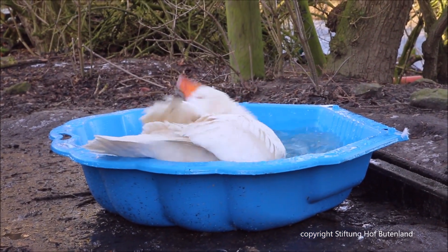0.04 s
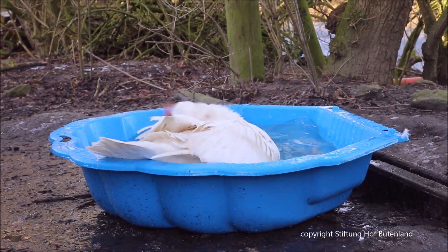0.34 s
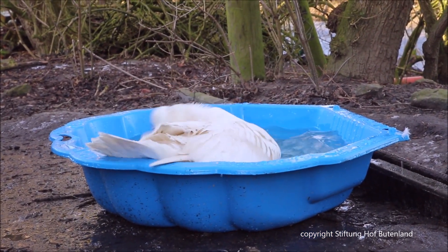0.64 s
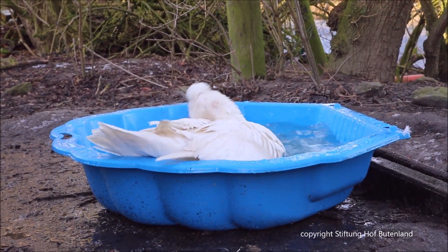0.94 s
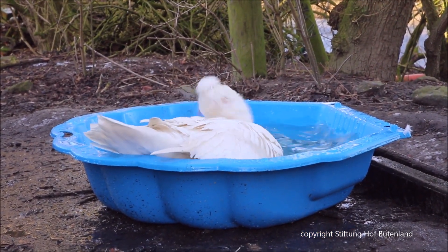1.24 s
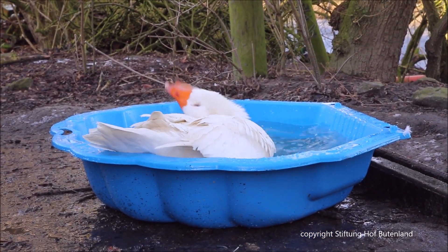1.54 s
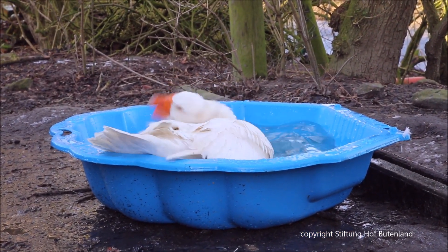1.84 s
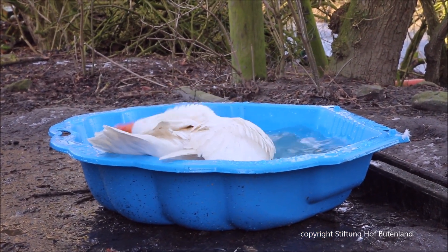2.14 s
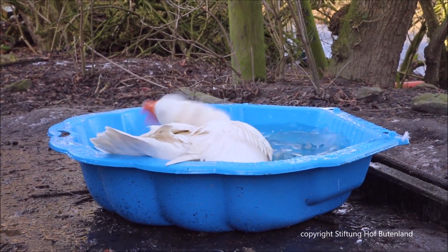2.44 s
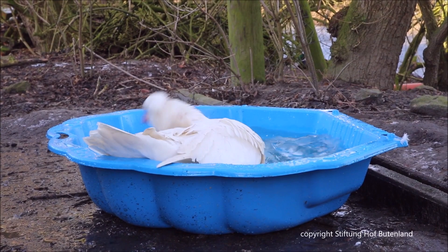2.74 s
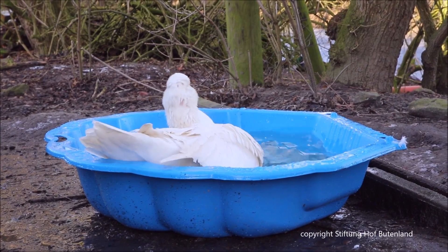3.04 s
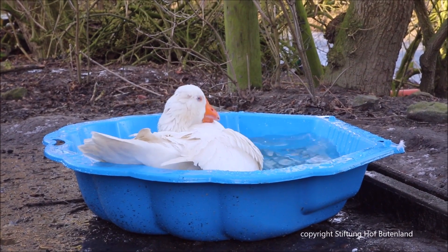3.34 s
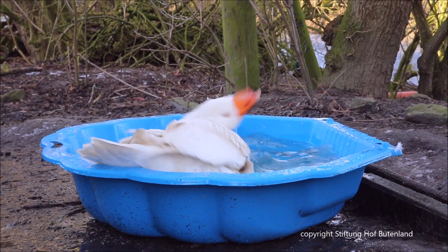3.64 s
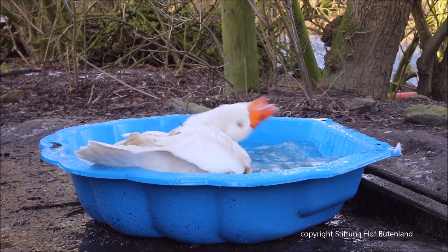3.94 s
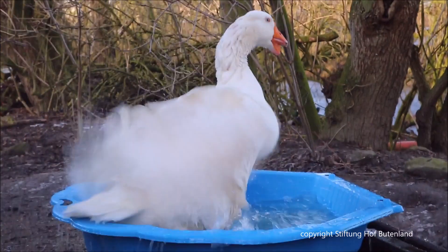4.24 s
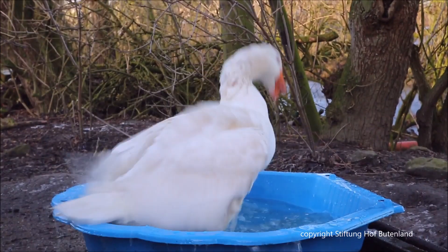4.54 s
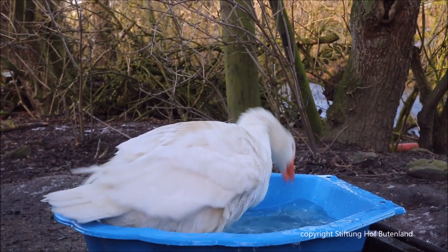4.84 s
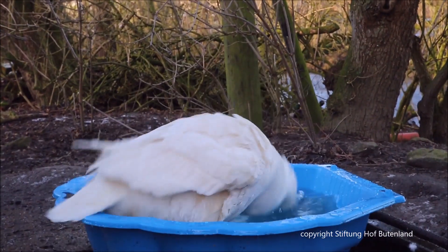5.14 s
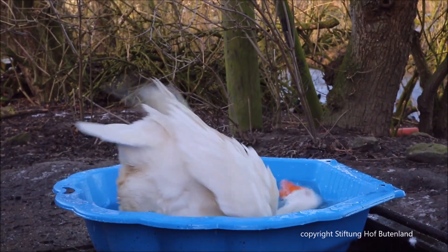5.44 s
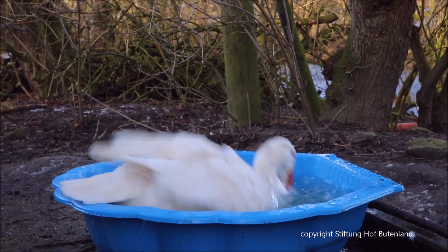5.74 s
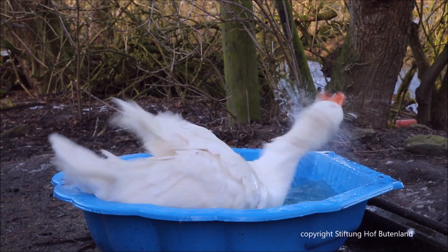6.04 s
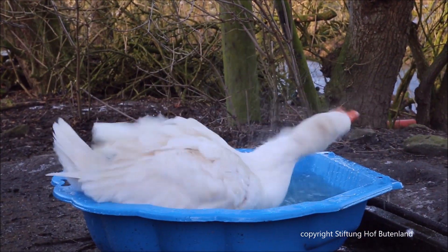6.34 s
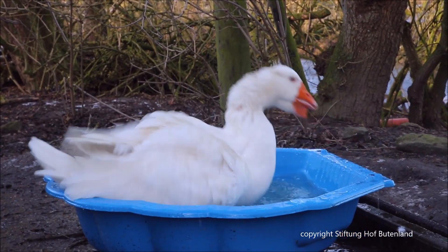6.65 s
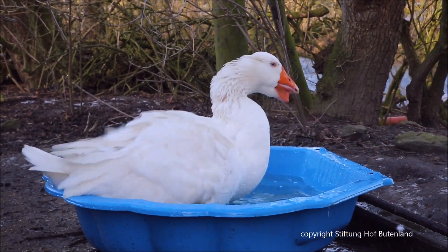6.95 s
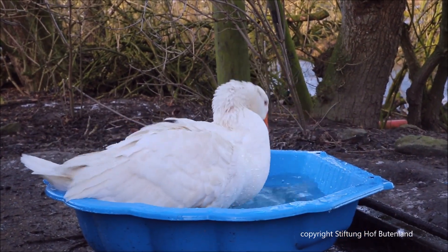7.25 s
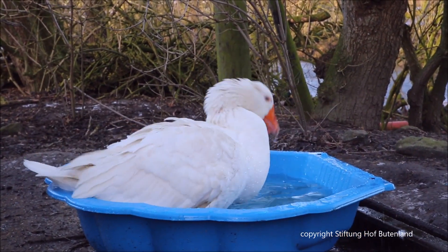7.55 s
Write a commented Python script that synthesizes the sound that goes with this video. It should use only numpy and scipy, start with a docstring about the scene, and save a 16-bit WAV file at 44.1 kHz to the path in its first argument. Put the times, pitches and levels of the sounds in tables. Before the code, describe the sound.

Outdoors among trees, jackdaws call in quick, hoarse yelps over the gentle water sounds of a preening goose nearby. After a split second of silence, the goose bathes more vigorously: wet wings snap, water splashes and gurgles, and the plastic pool knocks dully. Brief high songbird whistles come with the wing shaking. Finally the splashing calms and a distant songbird sings faintly over soft outdoor air.

```python
"""First a goose preens in a plastic paddling pool: water laps, wet feathers snap, and jackdaws call
in the trees, echoed by the wood. Just before 4 s the sound breaks off briefly. Then the goose shakes
its wings and bumps the pool, and small songbirds whistle. It ducks and splashes, churning up ringing
bubbles and spray. Last, the water settles while a distant songbird sings thin notes.
Outdoor air and a thin electronic whine run under both parts."""
import sys
import numpy as np
from scipy import signal
from scipy.fft import rfft, irfft, next_fast_len
from scipy.io import wavfile
from scipy.ndimage import map_coordinates

SR = 44100
rng = np.random.default_rng(int(sys.argv[2]) if len(sys.argv) > 2 else 0)


def master_out(mix):
    """Clip the mix to full scale and print it as 16-bit PCM to the path in sys.argv[1]."""
    frames = np.transpose(np.atleast_2d(mix))
    ceiling = np.clip(frames, -1, 1)
    pcm = np.round(ceiling * 32767).astype(np.int16)
    wavfile.write(sys.argv[1], SR, pcm)


N = 339129
T = np.arange(N) / SR
BREAK_S, BATH_S = 3.897, 4.097  # the sound stops, then comes back for the bath
TOP_HZ = 15850  # nothing higher than this is heard

# The tone of deep sloshing, of splashing and of fine spray, each: (frequency [Hz], level [dB])
SLOSH_TONE = [(70, -9.5), (140, -0.5), (260, 3.5), (450, 0), (800, -26.5)]
SPLASH_TONE = [(250, -20.5), (550, -2.5), (1000, -7.5), (1900, 2.5), (3000, -1), (5000, -4), (9000, -27)]
SPRAY_TONE = [(1500, -24), (3500, -2.5), (6000, 3), (8500, 3.5), (11000, -2.5), (13500, -9.5), (15500, -45)]
# How hard the water is churned, from the wing shake until it settles: (time [s], level [dB])
CHURNING = [(4.1, -39.5), (4.38, -39.5), (4.55, -56), (4.8, -54), (5.1, -53), (5.4, -49), (5.55, -43.5),
            (5.9, -42), (6.2, -42), (6.5, -53.5), (6.9, -58), (7.68, -55.5)]
# Strokes of bill, wings and body through water and wet feathers:
# (time [s], length [s], splash level [dB], slosh above splash [dB], spray above splash [dB])
GOOSE_STROKES = [(0, 0.032, -49, -10, 6), (0.293, 0.025, -40.5, -7.5, 0.5), (0.687, 0.055, -37.5, -9, -0.5),
                 (0.823, 0.084, -44, -3, -5.5), (2.3, 0.018, -52, -0.5, -6), (2.52, 0.043, -45, -4, -12),
                 (4.099, 0.014, -32, -2.5, 1), (4.165, .06, -42, -2.5, -1), (4.317, .035, -35, 2, 2),
                 (4.441, .02, -41.5, -1, 2), (4.533, 0.06, -49, -1, 8), (4.625, .08, -53, -2.5, 8.5),
                 (4.924, .02, -49, -2, -15), (5.01, .04, -50, -0.5, -14), (5.449, 0.065, -43, -8.5, -7),
                 (5.525, .04, -38, -17, -4), (5.632, 0.032, -46.5, 0.5, -9), (5.855, .035, -34, -6, -5),
                 (5.92, .02, -41.5, -3, 4.5), (6, 0.03, -39, -22, -1), (6.25, 0.088, -50.5, -2.5, 3.5),
                 (6.409, 0.034, -46.5, -2.5, 0.5), (6.588, .006, -47, 9, -3), (6.747, .02, -58, 3.5, 5),
                 (7.193, 0.013, -58.5, 8, 4), (7.358, 0.025, -56, 6, -8)]


def water():
    """The goose stirs up big slow bubbles, small chirping ones and spray, each on a wash of noise."""
    big = bubbles(1500, low_hz=150.3, high_hz=620, cycles=1.5, spread_db=2, rise=.023)
    slosh = unit(noise(SLOSH_TONE) + .9 * unit(coloured(big, SLOSH_TONE)))
    fizz = bubbles(5000, low_hz=509, high_hz=4190, cycles=4.4, spread_db=1, rise=.087)
    gurgle = bubbles(1500, low_hz=800, high_hz=3300, cycles=14, spread_db=2.4, rise=.13)
    splash = unit(noise(SPLASH_TONE) + unit(coloured(fizz, SPLASH_TONE)) + 1.2 * gurgle)
    mist = .88 * noise(SPRAY_TONE)
    tiny = bubbles(5000, low_hz=2800, high_hz=13570, cycles=6.8, spread_db=4, rise=.12)
    spray = unit(mist + unit(coloured(tiny, SPRAY_TONE)))
    lapping = amp(-50.5 - 3 * T + 4 * wobble(9)) * (T < BATH_S)  # slowly calms down
    churning = amp(np.interp(T, *np.transpose(CHURNING))) * (T >= BATH_S)
    # each motion: (loudness curve, slosh above splash [dB], spray above splash [dB])
    motions = [(lapping, -3, -9), (churning, -7, -3)]
    for start, length, db, slosh_db, spray_db in GOOSE_STROKES:
        stroke = amp(db) * rise_and_fade(start, length, attack_s=.02, fall_db_per_s=231.5)
        motions.append((stroke, slosh_db, spray_db))
    # motions that overlap add up in power, the square of their strength
    power = sum((amp([[slosh_db], [0], [spray_db]]) * curve) ** 2
                for curve, slosh_db, spray_db in motions)
    slosh_gain, splash_gain, spray_gain = np.sqrt(power)
    flicker = amp(1.5 * wobble(60))
    return slosh_gain * slosh + flicker * (splash_gain * splash + spray_gain * spray)


def bubbles(count, low_hz, high_hz, cycles, spread_db, rise):
    """A cloud of bubbles at random times; each rings briefly and rises in pitch as it dies away."""
    t = np.arange(900) / SR
    when, pitch, softness = rng.random((count, 3)).T[:, :, None]
    hz = low_hz * (high_hz / low_hz) ** pitch
    age = t * hz / cycles
    phase = np.cumsum(hz * (1 + rise * np.minimum(age, 4)), axis=1) / SR
    strength = amp(-spread_db * np.log(.02 + softness))  # a few loud ones, many quiet ones
    rings = strength * np.exp(-age) * (1 - t / t[-1]) * np.sin(2 * np.pi * phase)
    positions = (when * N).astype(int) + np.arange(len(t))
    return unit(np.bincount(positions.ravel(), rings.ravel(), N)[:N])


# Wet feathers snapping and drops hitting the plastic:
# (time [s], relative level [dB], extra level for the slap [dB])
WET_SNAPS = [(.676, -17, -7.5), (.695, -16, -8.5), (0.713, -24, -7), (4.115, -12, -19), (4.207, -16, -5.5),
             (4.224, -10, -19.5), (4.342, -13, -29), (4.483, -2.5, -41), (4.503, -16, -19),
             (4.691, -11, -35), (4.876, -20.5, -25), (5.203, -19, -15.5), (5.311, -15.5, -23),
             (5.71, -21.5, -14), (5.772, -14, -18), (5.9, -18, -28), (5.924, -17.5, -24), (6.128, -21, -8),
             (6.587, -23, -10.5)]


def snaps():
    """Each snap is a hard tick and a wet slap, with a short scatter of droplets after it."""
    out, t = np.zeros(N), np.arange(SR // 10) / SR
    tick = coloured(1.0 * (t == 0), SPRAY_TONE)
    tick = .25 * tick / np.abs(tick).max()
    fade = amp(-60 * t / .016) + amp(-21 - 60 * t / .1)  # quick slap, then quieter droplets
    for start, db, slap_db in WET_SNAPS:
        add(out, start, amp(db) * tick)
        for tone, burst_db in (SPLASH_TONE, slap_db + 2), (SPRAY_TONE, -12):
            add(out, start, amp(db + burst_db) * fade * noise(tone, len(t)))
    return out


# Bubbles big enough to hear one by one: (time [s], pitch [Hz], level [dB])
BIG_BUBBLES = [(1.922, 383, -38), (4.209, 2360, -13), (4.44, 943, -25), (5.622, 655, -27),
               (5.692, 2800, -21.5), (5.73, 1094, -30), (5.776, 2560, -19), (5.828, 1770, -23.5),
               (5.925, 1650, -28), (6.012, 1660, -23.5), (6.158, 2010, -23.5), (6.334, 1385, -24),
               (6.413, 1125, -28), (6.818, 1300, -35.5), (7.105, 1356, -35)]


def glugs(cycles=38, attack_s=.0047):
    """Single large bubbles rise in pitch as they surface; the bigger they are, the longer they ring."""
    out = np.zeros(N)
    for start, pitch_hz, db in BIG_BUBBLES:
        life = cycles / pitch_hz  # seconds to fade by 20 dB
        rise_octaves = .13 * pitch_hz / 1000  # smaller bubbles chirp more steeply
        t = np.arange(int(2 * life * SR)) / SR
        hz = pitch_hz * 2 ** (rise_octaves * t / life) * (1 + .13 * wobble(400, len(t)))
        loudness = amp(db - 20 * t / life) * (1 - np.exp(-t / attack_s))
        add(out, start, loudness * sine(hz))
    return out


# The goose bumps the pool: (time [s], relative level [dB])
BUMPS = [(4.105, -32), (4.344, -44), (5.863, -25), (6.589, -29)]
# The notes the pool rings with: (pitch [Hz], relative level [dB], time to fade by 60 dB [s])
POOL_NOTES = [(178, -8, 0.12), (292, -15, 0.062), (430, -1.5, 0.037), (628, 3.5, 0.063), (890, -13, 0.039),
              (1910, -14, .02)]


def knocks(level_db=-6):
    """The plastic pool, full of water, answers each bump with a short, dull ring."""
    out, t = np.zeros(N), np.arange(SR // 5) / SR
    for start, db in BUMPS:
        for hz, note_db, fade_s in POOL_NOTES:
            fade = amp(note_db + rng.normal(0, 5.3) - 60 * t / fade_s)
            ring = fade * np.sin(2 * np.pi * hz * t) * rng.choice([-1, 1])
            add(out, start, amp(db + level_db) * ring)
    return out


# The goose shifts its weight: (time [s], length [s], level [dB])
WEIGHT_SHIFTS = [(4.091, 0.018, -41), (4.325, 0.031, -49.5), (4.46, 0.093, -57), (5.87, .12, -47),
                 (6.229, .09, -47), (6.532, .25, -48), (6.808, .08, -35), (7.287, 0.028, -44),
                 (7.425, 0.026, -43.5), (7.53, .02, -46)]
# The deep tone of the bending pool wall: (frequency [Hz], level [dB])
POOL_WALL_TONE = [(20, -23.5), (50, 0), (78, -3.5), (110, 0.5), (220, -50.5)]


def wall_rumble():
    """The pool wall bends and rumbles each time the goose shifts its weight."""
    bending = sum(amp(db) * rise_and_fade(start, length, attack_s=.025, fall_db_per_s=300)
                  for start, length, db in WEIGHT_SHIFTS)
    return bending * noise(POOL_WALL_TONE)


# Short, falling jackdaw calls: (time [s], length [s], starting pitch [Hz], fall [octaves],
# relative level [dB], roughness [0-1], extra treble [dB])
JACKDAW_CALLS = [(.139, 0.031, 1229, 0.28, -18.5, 0.15, -4.5), (0.161, 0.04, 1000, .4, -24, 0.86, 0),
                 (0.356, 0.046, 1180, .46, -29, 0.1, 0), (0.509, 0.054, 1110, .28, -32.5, 0.37, 0),
                 (0.867, .051, 1066, 0.44, -22, 0.37, -1), (1.11, .046, 1081, .35, -25, 0.14, -0.5),
                 (1.154, .061, 1050, 0.3, -23.5, 0.31, 1), (1.208, 0.059, 1296, .36, -26.5, 0.8, -3.5),
                 (1.326, 0.055, 1011, .47, -28.5, 0.46, -3), (1.411, 0.059, 1311, .72, -25, 0.9, -2.5),
                 (1.496, .036, 1288, .31, -19.5, .37, -1), (1.523, .024, 1280, .2, -19.5, .55, 4),
                 (1.555, 0.043, 1006, 0.36, -23.5, 0.8, -2.5), (1.8, 0.052, 1050, .51, -21.5, 0.18, -1.5),
                 (2.07, .052, 1179, .72, -20.5, 0.34, 0), (2.238, 0.057, 1279, 0.51, -22.5, 0.53, 2.5),
                 (2.288, 0.041, 1052, .4, -23.5, 0.8, -.5), (2.446, .05, 1350, 0.18, -40.5, 0.35, -14),
                 (2.514, 0.047, 1273, 0.69, -26.5, 0.94, -3), (2.566, 0.055, 1031, 0.53, -27.5, 0.81, -1.5),
                 (2.697, .056, 1305, .52, -24, 0.58, -.5), (3.007, 0.06, 1228, .54, -22, 0.56, 0),
                 (3.414, 0.039, 1020, 0.13, -46, 0.3, -12), (3.752, 0.026, 1060, .17, -45, 0, -11)]
# How a jackdaw's throat shapes its voice: (frequency [Hz], level [dB])
THROAT_TONE = [(400, -27.5), (750, -14), (1150, -12), (1450, -4.5), (1900, -1), (2450, -1), (2900, -11),
               (3600, -17), (4400, -16.5), (5500, -13.5), (7000, -21.5), (10000, -28), (13000, -48.5)]


def jackdaws(attack_s=.008, release_s=.015):
    """Each call starts as a note with overtones, falls, and breaks into a brighter, hoarse rasp."""
    out = np.zeros(N)
    multiple = np.arange(1, 25)[:, None] / 2  # of the pitch: 1 is the base note
    for start, length, first_hz, fall, db, rough, bright_db in JACKDAW_CALLS:
        t = np.arange(int((length + release_s) * SR)) / SR
        progress = t / length
        rasp = rough * np.clip(2.11 * progress - .2, .05, 1)
        jitter = (.011 + .08 * rasp) * wobble(893, len(t))
        hz = first_hz * 2 ** (-fall * progress ** 1.4) * (1 + jitter)
        tones_hz = multiple * hz
        treble = np.clip(tones_hz / 1500 - 1.7, 0, 1)
        tones_db = along(THROAT_TONE, tones_hz) + (bright_db + 5 * (rasp - .4)) * treble
        # dull calls and soft calls lean more on the base note
        tones_db += 8 * rough * np.clip(-bright_db / 3, 0, 1) * (tones_hz < 1700)
        tones_db += 5 * np.clip((-27 - db) / 3, 0, 1) * (multiple == 1)
        waver_db = 3 * np.minimum(multiple / 4, 1) * np.array([wobble(70, len(t)) for _ in multiple])
        # every second vibration differs, which adds weaker tones halfway between the overtones
        halfway = np.where(multiple % 1, .77 * rasp, 1)
        gains = amp(tones_db + waver_db) * halfway * (tones_hz < TOP_HZ)
        # low tones stay clean while high ones blur
        blur = .45 * np.maximum(multiple - 2, 0) * np.array([wobble(260.7, len(t)) for _ in multiple])
        phase = multiple * np.cumsum(hz) / SR + rng.random(multiple.shape)
        voice = unit((gains * np.sin(2 * np.pi * phase + blur)).sum(0))
        hiss = .29 * np.sqrt(rasp) * noise(THROAT_TONE, len(t))
        flutter = np.exp(.57 * rasp * wobble(596.3, len(t)))
        fades = np.clip(t / attack_s, 0, 1) * np.clip((t[-1] - t) / (2 * release_s), 0, 1)
        loudness = amp(db - 2.5 * (progress - .5)) * fades
        add(out, start, loudness * unit((voice + hiss) * flutter))
    return out


# Songbird whistles: (time [s], length [s], pitch [Hz], level [dB], warble [share of pitch],
# extra level sent to the echo [dB])
SONGBIRD_WHISTLES = [(4.434, 0.049, 5040, -34, .004, 8), (4.458, 0.033, 5056, -27.5, 0.0033, 5),
                     (4.684, 0.0552, 3737, -21.5, 0.033, 0)]


def songbirds(warble_hz=72):
    """A plain whistle, then a warbled one; gives the direct sound and the sound that hits the trees."""
    direct, to_trees = np.zeros(N), np.zeros(N)
    for start, length, pitch_hz, db, warble, echo_db in SONGBIRD_WHISTLES:
        t = np.arange(int(length * SR)) / SR
        pulse = -np.cos(2 * np.pi * warble_hz * (t - length / 2))
        swell = np.sin(np.pi * t / length) * (1 + np.clip(22 * warble, 0, 1) * pulse)
        hz = pitch_hz * (1 + warble * (pulse + .61 * wobble(500, len(t))))
        note = amp(db) * swell * sine(hz)
        add(direct, start, note)
        add(to_trees, start, amp(echo_db) * note)
    return direct, to_trees


# A distant songbird's thin notes: (time [s], length [s], pitch [Hz], level [dB])
DISTANT_NOTES = [(6.64, .07, 4400, -59), (6.79, .05, 4430, -64), (6.9, .14, 4320, -60),
                 (7.22, .07, 4500, -61), (7.26, 0.1, 4220, -56), (7.51, 0.12, 4240, -57)]


def distant_songbird(trill_hz=17):
    """High, steady notes that pulse quickly, blurred by distance."""
    out = np.zeros(N)
    for start, length, pitch_hz, db in DISTANT_NOTES:
        hz = pitch_hz * (1 + .005 * wobble(250))
        out += amp(db) * rise_and_fade(start, length, attack_s=.02, fall_db_per_s=150) * sine(hz)
    return out * amp(2.5 * wobble(50) + 3 * np.sin(2 * np.pi * trill_hz * T))


def single_echo(sound, delay_s=.021, level_db=-6):
    """The sound bounces back once, a little later and quieter."""
    out = np.zeros(N)
    add(out, delay_s, amp(level_db) * sound)
    return out


# How long the wood keeps echoing: (frequency [Hz], time to fade by 60 dB [s])
WOOD_FADE = [(300, 0.22), (2200, 0.61), (5000, 0.56), (12000, 0.65)]


def woodland_echo(sound, trunks_db, tail_db, delay_s, trunks_fade_s):
    """Near trunks scatter a quick echo and the wood a longer one, changing from moment to moment."""
    out, size, step = np.zeros(N), SR * 3 // 4, SR // 4
    t = np.arange(size) / SR
    for centre in range(0, N, step):
        hz, age, bands = signal.stft(rng.standard_normal(size), SR, nperseg=256)
        fade = amp(-60 * age / along(WOOD_FADE, hz)[:, None])
        tail = signal.istft(bands * fade, SR, nperseg=256)[1][:size]
        bounces = rng.standard_normal(size) * (rng.random(size) < 500 / SR)  # about 500 a second
        trunks = bounces * amp(-60 * t / trunks_fade_s)
        echo = (amp(trunks_db) * unit(trunks) + amp(tail_db) * unit(tail)) / np.sqrt(size)
        # each overlapping piece of the sound gets its own echo
        first, last = max(0, centre - step), min(N, centre + step)
        piece = sound[first:last] * np.cos(np.pi / 2 * (np.arange(first, last) - centre) / step)
        add(out, first / SR + delay_s, signal.fftconvolve(piece, echo))
    return out


# The tone of the outdoor air: (frequency [Hz], level [dB])
AIR_TONE = [(12, -22.5), (20, -3), (54, 3.5), (132, 2.5), (242, -1.5), (347, -4), (555, -6), (638, -9),
            (1240, -4), (1640, -9.5), (2220, -6.5), (3180, -13), (9900, -16), (13100, -26), (15000, -46.5)]


def outdoor_air():
    """A soft, low rush that gently swells and sinks."""
    return amp(-48 + 1.45 * wobble(3.4)) * noise(AIR_TONE)


def electronic_whine(hz=15671):
    """One faint, steady, very high tone."""
    return amp(-60) * unit(np.sin(2 * np.pi * hz * T))


def amp(db):
    """Turn decibels into a number to multiply a sound by."""
    return 10 ** (np.asarray(db) / 20)


def unit(sound):
    """Scale a sound so that its average strength (rms) is 1."""
    return sound / np.sqrt(np.mean(sound ** 2) + 1e-20)


def sine(hz):
    """A pure tone that follows a changing pitch."""
    return np.sin(2 * np.pi * np.cumsum(hz) / SR)


def along(points, hz):
    """Read between the rows of a (frequency [Hz], value) table, with octaves evenly spaced."""
    frequencies, values = np.transpose(points)
    return np.interp(np.log(hz + 1), np.log(frequencies + 1), values)


def wobble(rate, size=N):
    """A smooth curve through `rate` random values a second."""
    return map_coordinates(rng.standard_normal(int(size * rate / SR) + 4), [np.arange(size) * rate / SR])


def rise_and_fade(start, length, attack_s, fall_db_per_s):
    """A loudness curve that rises until `start`, holds for `length` seconds and dies away."""
    rise = np.clip(1 + (T - start) / attack_s, 0, 1)
    return rise * amp(-np.clip(fall_db_per_s * (T - start - length), 0, 200))


def coloured(sound, tone, size=8192):
    """Filter a sound so that its lows and highs follow a tone table."""
    log_gain = np.log(amp(along(tone, np.fft.rfftfreq(size, 1 / SR))))
    # folding makes the filter ring only after a sound, never before it
    fold = np.r_[1, np.full(size // 2 - 1, 2), 1, np.zeros(size // 2 - 1)]
    ring = irfft(np.exp(rfft(irfft(log_gain) * fold)))
    return signal.fftconvolve(sound, ring)[:len(sound)]


def noise(tone, size=N):
    """Noise of strength 1, shaped by a tone table."""
    return unit(coloured(rng.standard_normal(size), tone))


def add(track, start_s, sound):
    """Mix a sound into a track at the given time."""
    first = max(0, round(start_s * SR))
    track[first:first + len(sound)] += sound[:max(0, N - first)]


def scene():
    """The goose in its pool, birds in the trees, their echoes, the air and the whine."""
    calls = amp(-1) * jackdaws()
    whistles, to_trees = songbirds()
    pool = water() + wall_rumble() + snaps() + glugs() + knocks()
    echoes = single_echo(calls)
    echoes += woodland_echo(calls, trunks_db=-8.5, tail_db=-4.5, delay_s=.018, trunks_fade_s=.14)
    echoes += woodland_echo(to_trees, trunks_db=-20, tail_db=-16, delay_s=.032, trunks_fade_s=.24)
    echoes += woodland_echo(pool, trunks_db=-24, tail_db=-13, delay_s=.011, trunks_fade_s=.13)
    background = outdoor_air() + electronic_whine()
    return (pool + calls + whistles + distant_songbird() + echoes + background)[None]


def record(dry):
    """The sound drops to silence just before the bath, and the very highest treble is cut away."""
    gate = np.interp(T, [BREAK_S, BREAK_S + .003, BREAK_S + .02, BATH_S, BATH_S + .001],
                     [1, .25, 0, 0, 1])
    size = next_fast_len(N + SR // 4)
    kept = np.fft.rfftfreq(size, 1 / SR) < TOP_HZ
    return irfft(rfft(dry * gate, size) * kept, size)[:, :N]


dry = scene()
out = record(dry)
master_out(out)
```